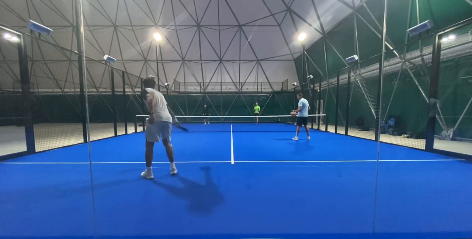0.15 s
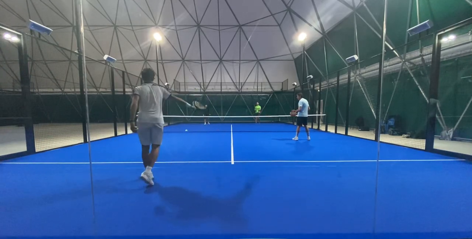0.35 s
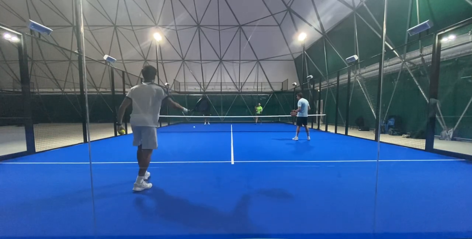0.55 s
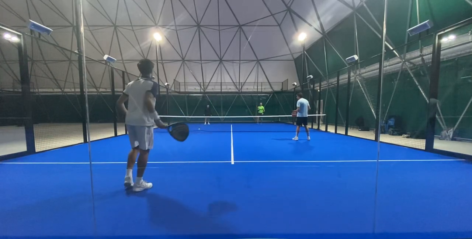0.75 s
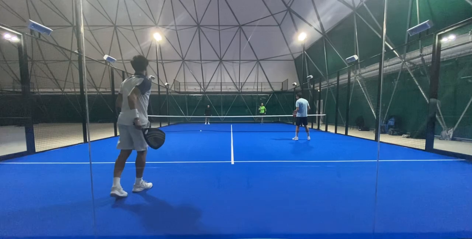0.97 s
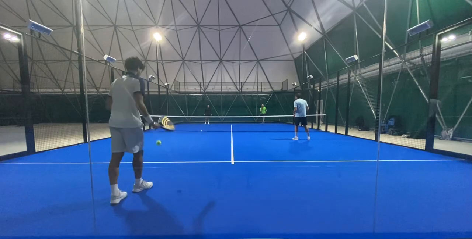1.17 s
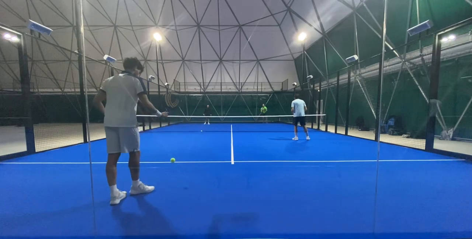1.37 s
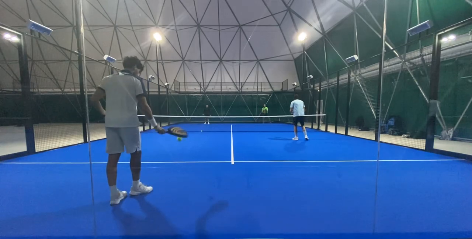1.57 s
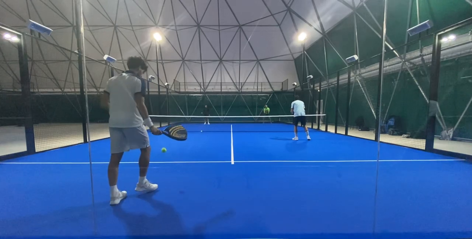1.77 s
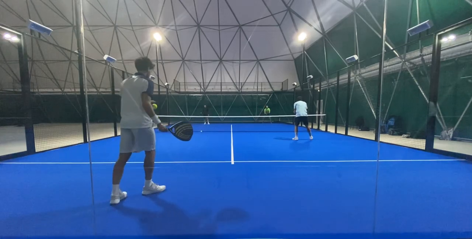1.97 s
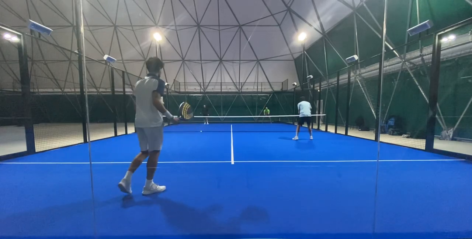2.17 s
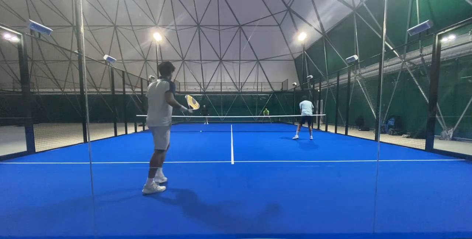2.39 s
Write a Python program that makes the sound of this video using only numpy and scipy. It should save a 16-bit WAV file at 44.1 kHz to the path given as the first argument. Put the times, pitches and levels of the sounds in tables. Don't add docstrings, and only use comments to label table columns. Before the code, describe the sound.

Racket hit on a ball rings out in a cavernous sports hall, then soft ball bounces follow.

```python
import sys
import numpy as np
from scipy import signal
from scipy.fft import rfft, irfft
from scipy.io import wavfile

SR = 44100
rng = np.random.default_rng(int(sys.argv[2]) if len(sys.argv) > 2 else 0)


def field_ratio(decibels):
    return 10 ** (np.asarray(decibels, dtype=float) / 20)


def wav_out(sig):
    wavfile.write(sys.argv[1], SR, np.round(np.clip(np.atleast_2d(sig).T, -1, 1) * 32767).astype(np.int16))


N = 107295
BLOW_N = 4096
STRIKE_S = 0.056
RING_RISE_S = 0.0033


def evened(x):
    return x / np.sqrt(np.mean(x ** 2) + 1e-20)


def read(points, hz):
    f, value = np.transpose(points)
    return np.interp(np.log(hz + 1), np.log(f + 1), value)


def modes(table, rise_s):
    t = np.arange(BLOW_N) / SR
    ringing = sum(field_ratio(db - 60 * t / t60) * np.sin(2 * np.pi * hz * t) for hz, db, t60 in table)
    blow = ringing * (1 - np.exp(-(t / rise_s) ** 2))
    return blow / np.linalg.norm(blow)


def click(colour):
    log_gain = np.log(field_ratio(read(colour, abs(np.fft.fftfreq(BLOW_N, 1 / SR)))))
    blow = np.fft.ifft(np.exp(np.conj(signal.hilbert(log_gain)))).real
    return blow / np.linalg.norm(blow)


def paired(left, other, hz):
    # pitch_hz, likeness (0 to 1)
    likeness = [(60, 0.93), (150, 0.84), (300, 0.82), (600, 0.12), (1500, 0.13), (4000, 0.12),
                (10000, 0.12)]
    lag_s, lag_from_hz = 0.000419, 81
    same = np.clip(read(likeness, hz), -1, 1)
    late = np.exp(-2j * np.pi * lag_s * np.maximum(hz - lag_from_hz, 0))
    return np.array([left, same * late * left + np.sqrt(1 - same ** 2) * other])


def diffuse(shape_db, size):
    # pitch_hz, left_right_db
    lean = [(60, -2.5), (220, 0.5), (830, 1), (3060, 2), (11400, 6)]
    hop = size // 4
    hz = np.fft.rfftfreq(size, 1 / SR)[:, None]
    t = np.arange(N // hop + 5) * hop / SR
    a, b, c, d = rng.standard_normal((len(t), len(hz), 4)).T
    side = np.array([0.5, -0.5])[:, None, None]
    spectra = paired(a + 1j * b, c + 1j * d, hz) * field_ratio(side * read(lean, hz) + shape_db(hz, t))
    noise = signal.istft(spectra, nperseg=size, noverlap=size - hop)[1]
    return noise[:, :N] / np.sqrt(size / 2)


def hall(start_s):
    # pitch_hz, t60_s
    decay = [(150, 0.94), (300, 2), (600, 4.26), (1000, 4.77), (2000, 4.75), (4000, 2.92), (7000, 1.42),
             (11000, 0.83)]
    return diffuse(lambda hz, t: -60 * np.maximum(t - start_s, 0) / read(decay, hz), size=512)


def washed(tail, level_db, blow, start_s, build_s):
    since = np.maximum(np.arange(N) / SR - start_s, 0)
    fill = 1 - np.exp(-(since / build_s) ** 0.93)
    return signal.oaconvolve(field_ratio(level_db) * fill * tail, blow[None], axes=1)[:, :N]


def echoes(rows, blow, since_s):
    air_db_per_s = 56
    out = np.zeros((2, N + BLOW_N))
    t = np.arange(BLOW_N) / SR
    hz = np.fft.rfftfreq(2 * BLOW_N, 1 / SR)
    for start_s, level_db, left_right_db, spread_s in rows:
        a, b = rng.standard_normal((2, BLOW_N)) * np.exp(-(t / spread_s) ** 2)
        scattered = paired(rfft(a, 2 * BLOW_N), rfft(b, 2 * BLOW_N), hz) * rfft(blow, 2 * BLOW_N)
        air = field_ratio(-air_db_per_s * (start_s - since_s) * (hz / 10 ** 4) ** 2)
        clump = irfft(scattered * air)[:, :BLOW_N]
        clump = clump / np.sqrt((clump ** 2).mean(axis=1, keepdims=True))
        gain = field_ratio([[level_db + 12.5 + left_right_db / 2], [level_db + 14.5 - left_right_db / 2]])
        out[:, round(start_s * SR):][:, :BLOW_N] += gain * clump
    return out[:, :N]


def blowers():
    # start_s, pitch_hz, level_db
    drone_path = [(0.0, 57.32, -36.5), (0.68, 58.29, -45.5), (0.8, 58.3, -42), (0.83, 60.6, -60),
                  (0.99, 66.3, -39), (1.23, 71.22, -38.5), (1.51, 71.88, -42.5), (1.61, 58.4, -44),
                  (1.73, 66.4, -39.5), (1.85, 65.7, -40), (1.98, 47.3, -52), (2.07, 54.8, -35),
                  (2.19, 60.8, -38.5), (2.43, 59.4, -54)]
    # pitch_hz, level_db (per Hz)
    wash_colour = [(22, -31), (45, 0.5), (110, -8.5), (220, -15.5), (550, -25.5), (1300, -24.5),
                   (4000, -50), (12000, -78.5)]
    overtone_hz, overtone_width_hz, overtone_db, wash_db = 100.6, 36, -48.5, -38
    t = np.arange(N) / SR
    s, hz, db = np.transpose(drone_path)
    phase = 2 * np.pi * np.cumsum(np.interp(t, s, hz)) / SR
    drone = np.sqrt(2) * field_ratio(np.interp(t, s, db)) * np.sin(phase)

    r = np.exp(-np.pi * overtone_width_hz / SR)
    fuzz = rng.standard_normal(N) + 1j * rng.standard_normal(N)
    for _ in range(2):
        fuzz = signal.lfilter([1 - r], [1, -r], fuzz)
    overtone = field_ratio(overtone_db) * evened((fuzz * np.exp(2j * np.pi * overtone_hz * t)).real)

    wash = evened(diffuse(lambda hz, t: read(wash_colour, hz) + 0 * t, size=2048))
    return drone + overtone + field_ratio(wash_db) * wash


def earlier():
    # pitch_hz, level_db, t60_s
    old_ring = [(415, -6, 0.016), (862, -7, 0.025), (1515, -3.5, 0.018), (2270, -5, 0.011)]
    blow = modes(old_ring, RING_RISE_S)
    return field_ratio(-41) * signal.oaconvolve(hall(0), blow[None], axes=1)[:, :N]


def bounces():
    # start_s, ring_db, thud_db, left_right_db
    hits = [
        (1.593, -47.5, -50.5, -5),
        (1.628, -52.5, -57, 8),
        (1.669, -64, -68, 1),
        (1.711, -54, -52, 0),
        (1.756, -53, -55, 2),
        (1.81, -51, -52, 2),
    ]
    # pitch_hz, level_db, t60_s
    pock_modes = [(874, 0.015, 0.023)]
    # pitch_hz, level_db, t60_s
    thud_modes = [(231.4, 0.33, 0.038), (309, -2.4, 0.036)]
    # pitch_hz, level_db (per Hz)
    scuff_colour = [(350, -17), (750, 6.5), (1400, 1), (2400, -8.5), (3500, -17), (5000, -29),
                    (9000, -49.5)]
    rise_s, thud_lag_s, build_s = 0.01, 0.01343, 0.059
    first_s = hits[0][0]
    out = np.zeros((2, N + BLOW_N))
    tail = hall(first_s)
    pock, thud = modes(pock_modes, rise_s), modes(thud_modes, rise_s)
    late_thud = np.roll(evened(thud), round(thud_lag_s * SR))
    for start_s, ring_db, thud_db, left_right_db in hits:
        hit = field_ratio(ring_db) * evened(pock) + field_ratio(thud_db) * late_thud
        gain = field_ratio([[left_right_db / 2], [-left_right_db / 2]])
        out[:, round(start_s * SR):][:, :BLOW_N] += gain * hit
    tails = [(-47, pock), (-37.5, thud), (-40, click(scuff_colour))]  # level_db, blow
    return out[:, :N] + sum(washed(tail, db, blow, first_s, build_s) for db, blow in tails)


def strike():
    # start_s, level_db, left_right_db, spread_s
    ring_echoes = [(.0562, -49.5, 11, 0.024), (.066, -43.5, -0.5, 0.012), (.097, -50.5, 10, 0.0072),
                   (.113, -44.5, -4.5, 0.013), (.218, -48.5, -10, 0.016), (.238, -40.5, 5, 0.024),
                   (.264, -51.5, 0, 0.025), (.293, -52.5, 6, 0.054), (.455, -49.5, 4, 0.026),
                   (.612, -49.5, 10, 0.04), (.738, -52, 6, 0.012), (.845, -64, 5, 0.014)]
    # start_s, level_db, left_right_db, spread_s
    knock_echoes = [(.058, -50, 2, 0.0055), (.072, -48.5, -3, 0.039), (.105, -49, 7, 0.015),
                    (.165, -49, 0, 0.036), (.188, -49, -1, 0.012), (.222, -47.5, 7.5, 0.016),
                    (.298, -55.5, 14, 0.004), (.418, -54, -3.5, 0.013)]
    # start_s, level_db, left_right_db, spread_s
    crack_echoes = [(.0562, -66, 8, .006), (.0668, -63, 1.5, 0.0057), (.0937, -53.5, -2, 0.012),
                    (.111, -50.5, -1, 0.021), (.1651, -49.5, 8, 0.0061), (.185, -66.5, -24, 0.02),
                    (.247, -53, -4, 0.022), (.324, -65.5, -5, 0.005)]
    # pitch_hz, level_db, t60_s
    ring_modes = [(752, 6, 0.015), (807.3, -2, 0.034), (879.3, -2, 0.027), (1083, -16.5, 0.0084),
                  (1231, -13, 0.029)]
    # pitch_hz, level_db, t60_s
    knock_modes = [(226.7, -11.5, 0.026), (278.3, -1.5, 0.036), (369.4, 3, 0.023), (414.6, -3, 0.024)]
    # pitch_hz, level_db (per Hz)
    crack_colour = [(500, -16.5), (1400, 2.5), (2100, -4), (3000, -10), (3600, -9.5), (4600, -15.5),
                    (6600, -15), (11500, -34)]
    parts = [  # echoes, tail level_db, blow, build_s for the dome to fill
        (ring_echoes, -23.5, modes(ring_modes, RING_RISE_S), 0.067),
        (knock_echoes, -25, modes(knock_modes, 0.0055), 0.083),
        (crack_echoes, -24.5, click(crack_colour), 0.055),
    ]
    tail, out = hall(STRIKE_S), 0
    for rows, tail_db, blow, build_s in parts:
        out = out + echoes(rows, blow, STRIKE_S) + washed(tail, tail_db, blow, STRIKE_S, build_s)
    return out


def scene():
    return blowers() + earlier() + bounces() + strike()


def top_cut(x):
    return signal.sosfilt(signal.butter(12, 11960, fs=SR, output="sos"), x)


def record(dry):
    treble_cut = signal.butter(4, 12000, fs=SR, output="sos")
    low_cut = signal.butter(4, 44, "high", fs=SR, output="sos")
    fade = np.minimum(np.arange(N)[::-1] / SR / 0.004, 1)
    mix = signal.sosfilt(np.vstack([treble_cut, low_cut]), dry) * fade
    return top_cut(mix)


dry = scene()
out = record(dry)
wav_out(out)
```